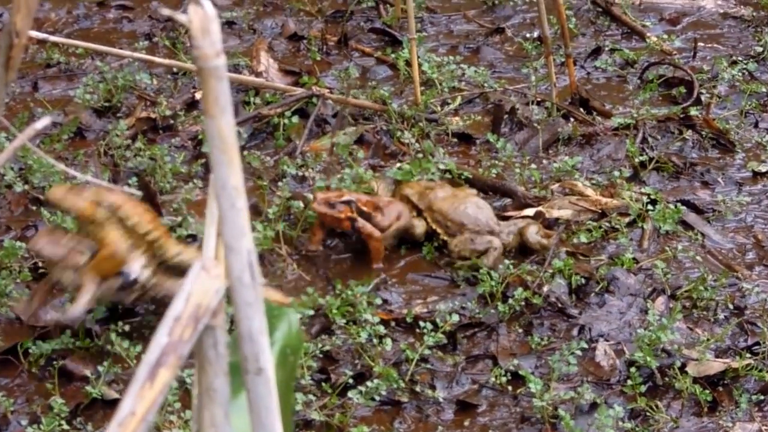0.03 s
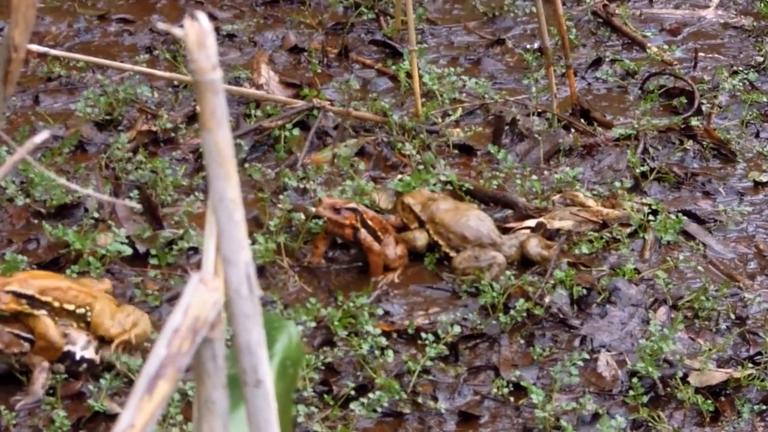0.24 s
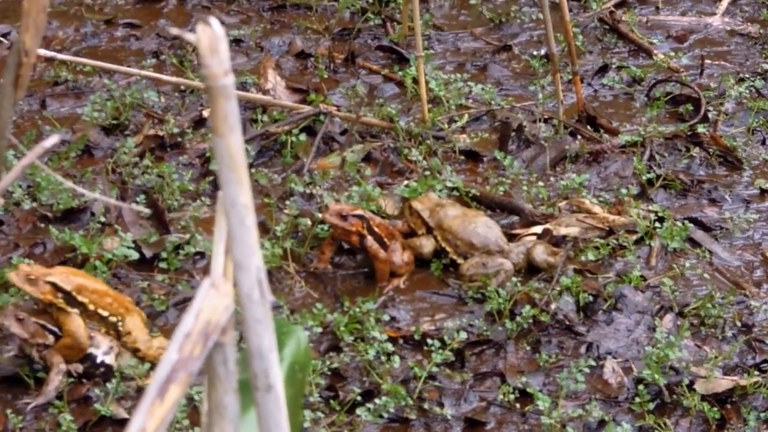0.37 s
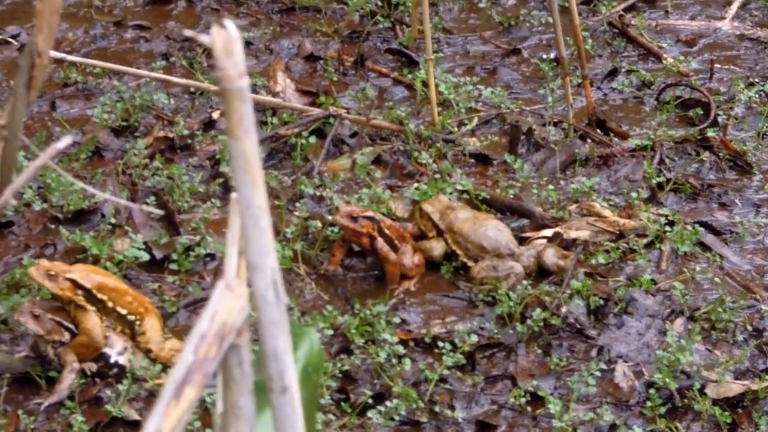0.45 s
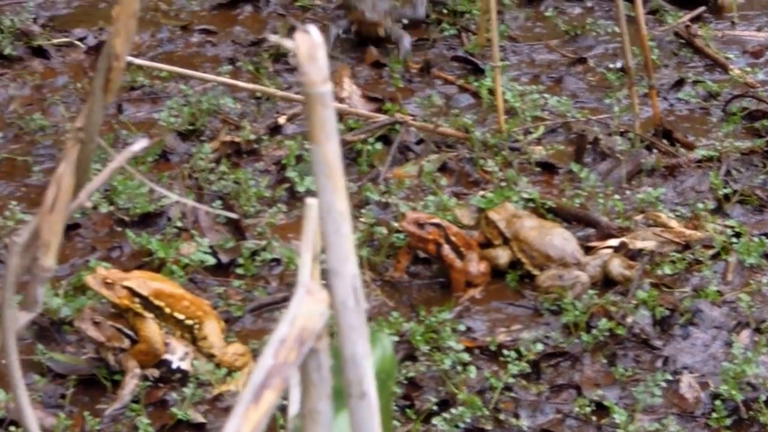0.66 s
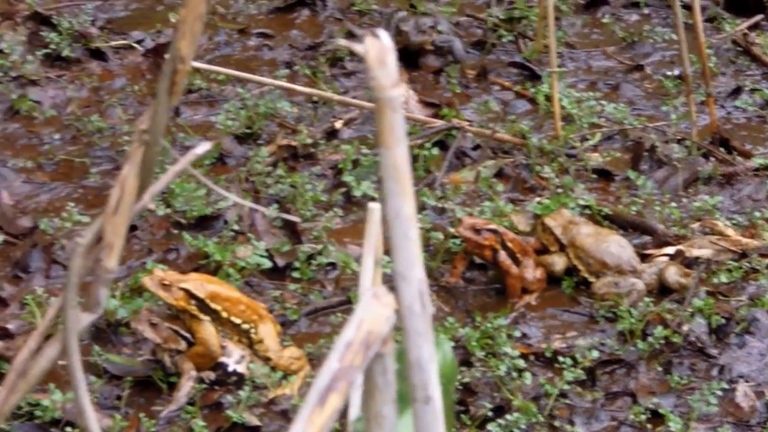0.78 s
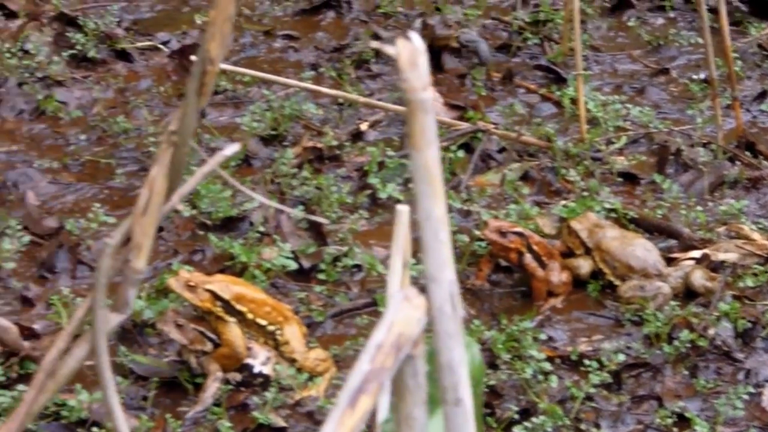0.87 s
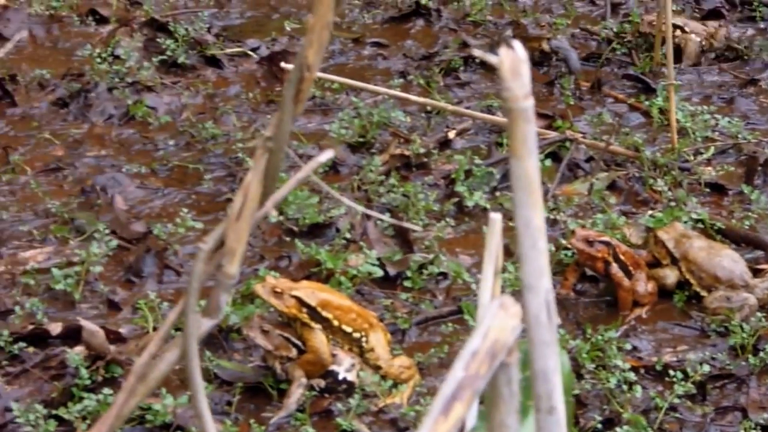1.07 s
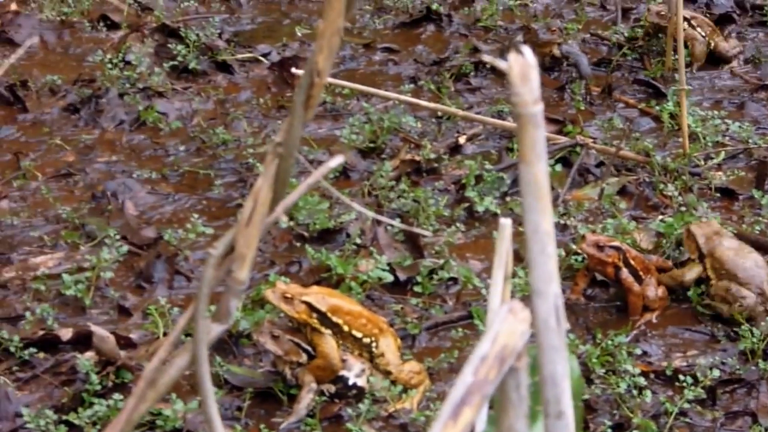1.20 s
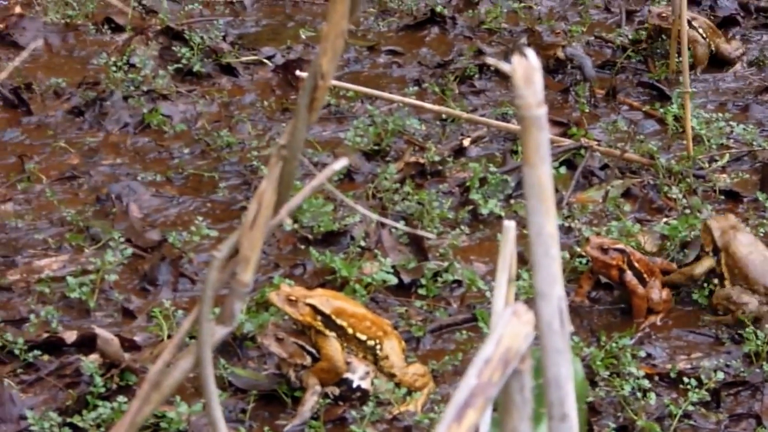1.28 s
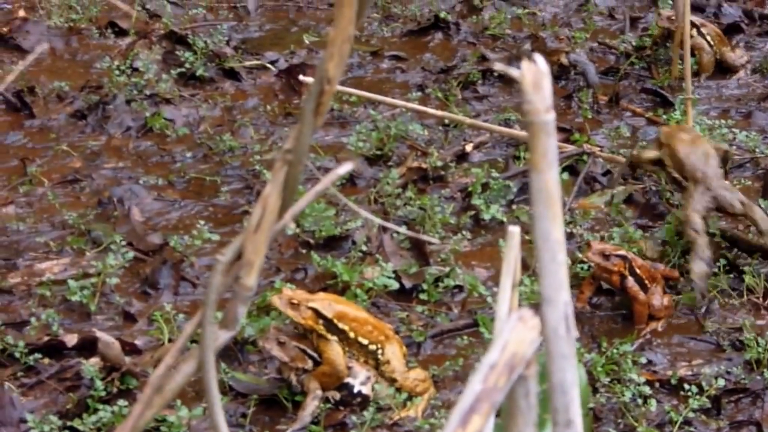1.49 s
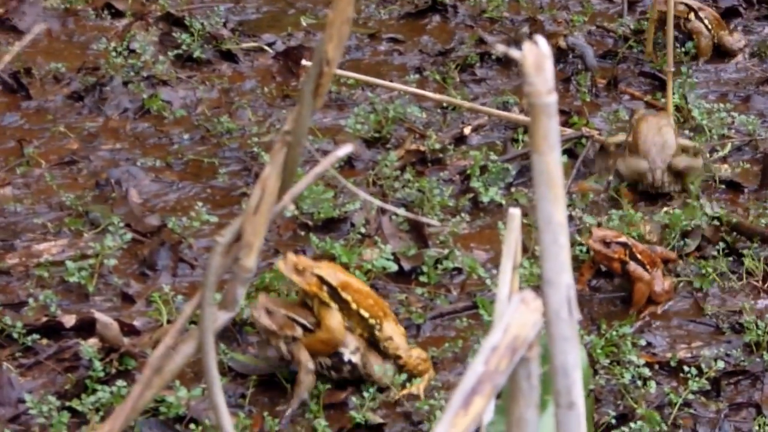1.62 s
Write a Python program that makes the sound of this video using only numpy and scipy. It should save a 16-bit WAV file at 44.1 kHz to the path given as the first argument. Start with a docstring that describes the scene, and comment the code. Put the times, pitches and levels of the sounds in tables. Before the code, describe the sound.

Toads cluck close to the microphone in quick, throaty bursts, sometimes two at once. Small wet snaps and plops come between the calls as they move on mud, over a soft outdoor hiss and faint distant toads.

```python
"""Toads cluck close by on wet mud, sometimes two at once. Each call is a few throat pulses that ring
the vocal sac, most calls lengthening and sinking in pitch as they go. Moving toads make wet snaps,
sprays, plops and a faint rustle, and one farther off starts to purr at the end.
Behind them lie a soft outdoor hiss, a low rumble and the blur of distant toads."""
import sys
import numpy as np
from scipy import signal
from scipy.fft import rfft, irfft
from scipy.io import wavfile
from scipy.ndimage import uniform_filter1d

SR = 44100
rng = np.random.default_rng(int(sys.argv[2]) if len(sys.argv) > 2 else 0)


def int16_out(signal):
    """Quantize to a 16-bit WAV file."""
    q = np.round(np.clip(np.atleast_2d(signal).T, -1, 1) * 32767)
    wavfile.write(sys.argv[1], SR, q.astype(np.int16))


N = 72765

# The clucks. Each row: start in seconds, pulse count, first gap and its growth per pulse in seconds,
# level, mid-call swell and change by the end in dB, pitch and its fall in Hz,
# last pulse length in seconds, overtone level in dB, voice.
CALLS = [ (.075, 5, .012, 0, -52, 1, 3, 620, -60, .007, -16, "soft"),
         (0.2096, 2, 0.02, 0, -26.5, 0, 0, 729, 0.5, 0.0088, 2.5, "bright"),
         (0.2388, 2, 0.0033, 0, -36, 0, 3.5, 708, -3, 0.011, -4, "nasal"),
         (0.278, 4, .014, 0, -47.5, 2, 5, 790, 107, 0.013, -10, "soft"),
         (.3388, 2, .0047, 0, -35, 0, 0, 623, 21, .011, -4, "soft"),
         (.3641, 5, .0121, -.0004, -25, 1.5, 2.5, 795, 35, .0145, 1.5, "bright"),
         (0.4213, 2, 0.0066, 0, -36, 0, -4, 710, 3, 0.013, -19, "soft"),
         (.4840, 3, 0.01, -0.001, -26.5, 1.5, -4, 611, 88, 0.014, 3, "soft"),
         (.5279, 5, .0120, .0001, -19.5, 2.5, -3, 805, 85, .0105, 0, "bright"),
         (0.632, 2, 0.011, 0, -26, 0, -5, 631, 97, 0.017, 2.5, "soft"),
         (.7076, 4, .0110, 0.0028, -21, -0.5, -1, 817, 63, 0.0055, -0.5, "bright"),
         (0.756, 2, 0.00506, 0, -28.5, 0, 5, 730, 38, 0.0072, -6, "bright"),
         (0.7696, 3, 0.011, -0.00073, -26, 2, -7.5, 564, 100, 0.013, -3.5, "soft"),
         (.9060, 4, .0124, 0, -25, 3, -0.5, 655, 139, 0.0064, 1.5, "soft"),
         (0.9128, 5, .0121, .0001, -22.5, 3, -4, 787, 78, 0.013, -0.5, "bright"),
         (1.0467, 4, 0.013, 0.000018, -22, -0.5, 0, 776, 35, 0.0075, -1.5, "nasal"),
         (1.1022, 2, 0.0088, 0, -24.5, 0, -7, 574, 91, 0.01, -4.5, "soft"),
         (1.2376, 5, 0.011, -0.00048, -20.5, 1, -2, 802, 16, 0.0098, 0.5, "nasal"),
         (1.4167, 4, .0134, .0001, -22.5, 1, 0, 815, 20, .0085, -2, "nasal"),
         (1.472, 2, 0.013, 0.0079, -34.5, 0, -10, 823, 33, 0.006, -18, "soft")]
# Throat resonances of each voice. Each row: frequency in Hz, relative level in dB.
VOICES = { "bright": [(470, -19), (1200, -38), (1550, -27), (2400, -18.5), (3250, -25.5), (4950, -23),
          (5450, -20), (9150, -15), (11000, -23)], "nasal": [(470, -23.5), (1040, -17), (1280, -12),
          (1630, -15.5), (2500, -30), (5950, -18), (9400, -25), (11000, -31)], "soft": [(800, -35),
          (1150, -6.5), (1600, -22.5), (4950, -18), (9600, -48)]}
# Where the calls sit. Each row: frequency in Hz, left boost and equal right cut in dB.
CALL_PAN = [(400, -0.2), (750, -0.33), (1000, -0.5), (1300, 0.5), (2000, -1), (5000, 1.8)]
# Wet snaps. Each row: start in seconds, level in dB, centre and width in Hz, decay in seconds,
# tick-to-fizz ratio, spray level in dB, spray decay in seconds.
SNAPS = [ (0.3883, -32, 10500, 4500, 0.0038, 0.6, -39, 0.0079),
         (0.3942, -29, 3400, 1200, 0.003, 0.5, -42, 0.0087),
         (.5892, -23, 10800, 2600, 0.0016, 0.5, -40, 0.01), (.5930, -13, 3000, 2200, 0.0005, 5, -41, 0.018),
         (.5931, -23, 8900, 1500, 0.0007, 3, -48, 0.006), (0.5935, -27, 3200, 1400, 0.005, 0.4, -56, 0.023),
         (.594, -38, 2100, 800, .012, .3, -60, .01), (0.7095, -51, 7900, 6000, 0.0012, 0.5, -41.5, 0.0088),
         (0.934, -37, 11000, 5000, 0.0055, 0.7, -40.5, 0.02),
         (0.938, -38, 4740, 2500, 0.005, 0.7, -46, 0.018),
         (1.3003, -23, 13500, 3970, 0.00035, 2, -57, .005),
         (1.3003, -19.5, 6900, 2220, 0.0016, 1.2, -51, 0.04),
         (1.3015, -32, 2840, 495, 0.002, 0.8, -60, .01), (1.309, -49, 7200, 2000, .02, 0.1, -62, 0.05)]
# Mud pops. Each row: start in seconds, level in dB, pitch in Hz, decay in seconds, left lean in dB.
PLOPS = [(0.616, -34, 590, 0.018, -2), (0.621, -30, 1410, 0.0022, 22), (0.622, -28, 834, 0.011, 2),
         (0.643, -34, 1370, 0.0017, 14)]
# Drops landing. Each row: start in seconds, level in dB, pitch in Hz.
DROPLETS = [(0.4202, -37.5, 6830), (0.6812, -41.5, 2600), (1.194, -43.5, 6000), (1.312, -39, 6950),
            (1.324, -47, 7400), (1.3698, -44, 5460), (1.379, -44.5, 7600)]
# Leaf hiss. Each row: centre in Hz, width in Hz, level in dB.
RUSTLE_BANDS = [(3470, 390, -56.5), (11700, 1300, -61.5)]
# Tone curves for the sac's radiation, throat rasp, spray, air, rumble, echo and microphone.
# Each row: frequency in Hz, gain in dB.
SAC_EQ = [(150, 0), (280, -7.5), (400, 2), (900, 0.5), (1100, -6.5), (1400, -3.5), (2400, -1.5),
          (14000, -4.5)]
RASP_EQ = [(1000, 9), (2500, 2.5), (4000, -3.5), (7000, 1), (10000, 6.5), (12000, 2), (15000, -17)]
SPRAY_EQ = [(800, -52), (2000, 0.5), (3300, -4), (5000, -1), (7500, 0), (12000, 0), (15000, -17)]
AIR_EQ = [(30, 1), (150, 0.5), (300, 2.5), (700, -5), (1100, -9), (2000, -5), (4000, -7.5), (8000, -11.5),
          (13500, -11.5), (16000, -51)]
RUMBLE_EQ = [(15, -14), (30, -2), (80, -2), (130, -8), (220, -15.5), (500, -60)]
ECHO_EQ = [(300, -10.5), (800, -7), (1300, -6.5), (3000, -2.5), (6000, -4), (12000, -4)]
MIC_EQ = [(20, -3), (13000, 0), (14200, 7), (14900, -27), (16500, -25)]
# How centred the air sounds. Each row: frequency in Hz, left-right correlation.
AIR_LIKENESS = [(30, 1), (130, 0.51), (700, 0.16), (2000, 0.12), (12000, 0.028)]
# Fader rides for the air's treble (taken about its mean) and the distant toads.
# Each row: time in seconds, level in dB.
TREBLE_RIDE = [(0.0, -53.5), (0.532, -56.5), (0.73, -58), (1.034, -56.5), (1.138, -58.5), (1.65, -56.5)]
FAR_RIDE = [(0.0, -64), (0.12, -61), (0.31, -55.5), (0.45, -60), (0.68, -56), (1.65, -57)]

FIRST_PULSE_S, ATTACK_S, OVERTONE_S = .0046, .0018, .0051
RING_DB, RING_S, RASP_DB = -22.5, .02, -17.5
PULSE_JITTER_S, PULSE_SCATTER_DB, OVERTONE_JITTER, SLIP_CYCLES = .00009, 1.44, .024, .094
SPRAY_DROPS_PER_S, SPLASH_WIDTH = 3500, .23
PURR_START_S, PURR_ATTACK_S, PURR_PULSES_PER_S, PURR_HZ, PURR_DB = 1.584, .012, 130, 753, -45
AIR_DB, RUMBLE_DB, RUMBLE_RISE_DB_PER_S, FAR_HZ = -52, -55, 4, 617
ECHO_DB, ECHO_S = -9.5, .018


def toads():
    """Each pulse rings the vocal sac and, briefly, the throat's overtones, with a little rasp."""
    tone, effort = np.zeros(N), np.zeros(N)
    t = np.arange(SR // 16) / SR
    for start, count, gap, growth, db, swell, end_db, hz, fall, last, over_db, voice in CALLS:
        modes_hz, modes_db = np.array(VOICES[voice], float).T
        for k in range(count):
            progress = k / (count - 1)
            onset = start + k * gap + growth * k * (k - 1) / 2 + rng.normal(0, PULSE_JITTER_S)
            contour_db = swell * np.sin(np.pi * progress) + end_db * progress
            level = amp(db + contour_db + rng.normal(0, PULSE_SCATTER_DB))
            length = FIRST_PULSE_S + (last - FIRST_PULSE_S) * progress ** 2
            pitch = hz - fall * progress ** 2.9
            stretch = length / FIRST_PULSE_S  # longer pulses open more slowly and sound duller
            rise = np.sin(np.pi / 2 * np.minimum(t / (ATTACK_S * stretch ** .43), 1)) ** 2
            body = np.exp(-(t / length) ** np.pi) + amp(RING_DB) * np.exp(-t / RING_S)
            sac = rise * body * np.sin(2 * np.pi * pitch * t)
            bite = amp(over_db) * rise * np.exp(-(t / (OVERTONE_S * stretch)) ** np.pi) / stretch ** .8
            # Overtones follow part of the pitch fall and slip in phase from pulse to pulse.
            detune = (pitch / hz) ** .77 * rng.normal(1, OVERTONE_JITTER, len(modes_hz))
            slip = rng.normal(0, SLIP_CYCLES * np.minimum(modes_hz / hz, 2))
            cycles = np.outer(modes_hz * detune, t - ATTACK_S) + pitch * ATTACK_S + slip[:, None]
            throat = amp(modes_db) @ np.sin(2 * np.pi * cycles)
            add(tone, onset, level * (sac + bite * throat))
            add(effort, onset, level * bite)
    rasp = spread(unit(colour(white(), RASP_EQ)), width=.43)
    panned = np.array([colour(tone, [(hz, side * db) for hz, db in CALL_PAN]) for side in (1, -1)])
    return colour(panned + amp(RASP_DB) * effort * rasp, SAC_EQ)


def splashes():
    """A foot snaps the film of water, and fine droplets scatter after it."""
    snaps, spray_power = 0, 0
    for start, db, hz, width, decay, tick, spray_db, spray_s in SNAPS:
        t = since(start)
        snaps += amp(db) * snap(start, hz, width, decay, tick)
        spray_power += (amp(spray_db) * (t > 0) * np.exp(-t / spray_s)) ** 2
    drops = white() * (rng.random(N) < SPRAY_DROPS_PER_S / SR)
    return spread(snaps + np.sqrt(spray_power) * unit(colour(drops, SPRAY_EQ)), SPLASH_WIDTH)


def snap(start, hz, width_hz, decay_s, tick):
    """A tick and a dying fizz in one band, as a centre and a side signal."""
    t = since(start)
    strike = (t > 0) * np.exp(-t / decay_s)
    energy = np.sum(strike ** 2)
    crack = white() * strike
    crack[0, int(start * SR)] += tick * np.sqrt(energy)
    for _ in range(3):
        crack = band(crack, hz, 2 * width_hz)
    return crack * np.sqrt(energy / np.sum(crack ** 2, axis=1, keepdims=True))


def plops():
    """Soft mud gives way with a few low, damp pops, mostly on the left."""
    pops = 0
    for start, db, hz, decay, pan in PLOPS:
        pop = snap(start, hz, width_hz=190, decay_s=decay, tick=.67)[0]
        pops += amp([[db + pan / 2], [db - pan / 2]]) * pop
    return pops


def droplets():
    """Larger drops land one by one with a small, bright tick."""
    ticks = sum(amp(db) * snap(start, hz, width_hz=850, decay_s=.0017, tick=1.3)
                for start, db, hz in DROPLETS)
    return spread(ticks, SPLASH_WIDTH)


def rustle(peak_s=.25, swell_s=.15):
    """A faint hiss in two narrow bands swells and fades as the first toad settles among the leaves."""
    hiss = sum(amp(db) * unit(band(white(), hz, width)) for hz, width, db in RUSTLE_BANDS)
    return np.exp(-((since(0) - peak_s) / swell_s) ** 2 / 2) * spread(hiss, SPLASH_WIDTH)


def purr():
    """A toad farther off starts a soft, rough purr, its quick pulses blurred by distance."""
    t = since(PURR_START_S)
    pulses = 1 - .5 * np.cos(2 * np.pi * PURR_PULSES_PER_S * t)
    throat = unit(band(band(rng.standard_normal(N), PURR_HZ, 280), PURR_HZ, 280))
    return amp(PURR_DB) * (1 - np.exp(-t / PURR_ATTACK_S)) * pulses * throat


def far_toads():
    """Distant toads blur into one wavering band of noise."""
    waver = rng.standard_normal(N)
    for _ in range(2):
        waver = uniform_filter1d(waver, size=1500, mode="wrap")
    blur = unit(band(band(white(), FAR_HZ, 1180), FAR_HZ, 1180))
    level_db = np.interp(since(0), *np.array(FAR_RIDE).T) + 3 * unit(waver)
    return amp(level_db) * spread(blur, width=.59)


def outdoors():
    """A soft hiss whose treble drifts in level, over a slowly rising rumble."""
    hz, t = np.fft.rfftfreq(N, 1 / SR), since(0)
    air = amp(AIR_DB) * wide_noise(AIR_EQ)
    treble = irfft(rfft(air) * hz ** 2 / (hz ** 2 + 1500 ** 2), N)
    times, ride_db = np.array(TREBLE_RIDE).T
    treble_gain = amp(2 + np.interp(t, times, ride_db - ride_db.mean()))
    rumble = amp(RUMBLE_DB + RUMBLE_RISE_DB_PER_S * (t - t.mean())) * wide_noise(RUMBLE_EQ)
    return air + treble * (treble_gain - 1) + rumble


def wide_noise(eq):
    """Coloured noise, centred in the bass and wide in the treble."""
    likeness = along(AIR_LIKENESS, np.fft.rfftfreq(N, 1 / SR))
    centre_side = irfft(rfft(white()) * np.sqrt([1 + likeness, 1 - likeness]), N)
    return unit(colour(spread(centre_side, width=1), eq))


def white(n=N):
    return rng.standard_normal((2, n))


def amp(db):
    return 10 ** (np.asarray(db) / 20)


def unit(x):
    return x / np.sqrt(np.mean(x ** 2))


def along(curve, hz):
    """A curve's value at the given frequencies."""
    knots_hz, values = np.array(curve, float).T
    return np.interp(np.log(hz + 1), np.log(knots_hz), values)


def colour(x, eq):
    """Filter by a tone curve."""
    n = x.shape[-1]
    return irfft(rfft(x) * amp(along(eq, np.fft.rfftfreq(n, 1 / SR))), n)


def band(x, hz, width_hz):
    """One resonance."""
    return signal.lfilter(*signal.iirpeak(hz, hz / width_hz, SR), x)


def spread(pair, width):
    """Left and right from a centre and a side signal."""
    return pair[0] + width * pair[1] * np.array([[1], [-1]])


def since(start):
    """Seconds since an event, zero before it."""
    return np.maximum(np.arange(N) / SR - start, 0)


def add(out, start, x):
    i = int(max(start, 0) * SR)
    out[i:i + len(x)] += x[:max(N - i, 0)]


def echo(near):
    """A short, diffuse tail follows the near sounds after 4 ms."""
    t = np.arange(SR // 4) / SR
    tail = colour(white(len(t)), ECHO_EQ) * np.exp(-t / ECHO_S) * (t > .004)
    tail = spread(unit(tail), width=.12) / np.sqrt(len(t))
    return amp(ECHO_DB) * signal.fftconvolve(near, tail, axes=1)[:, :N]


def scene():
    """Toads and wet movement, with their echo, over the outdoor bed."""
    near = toads() + purr() + splashes() + droplets() + plops() + rustle()
    return near + echo(near) + outdoors() + far_toads()


def record(dry):
    """The microphone peaks near 14 kHz and loses the very top."""
    top_cut = signal.ellip(8, .2, 70, 16500, fs=SR, output="sos")
    return signal.sosfilt(top_cut, colour(dry, MIC_EQ))


dry = scene()
out = record(dry)
int16_out(out)
```